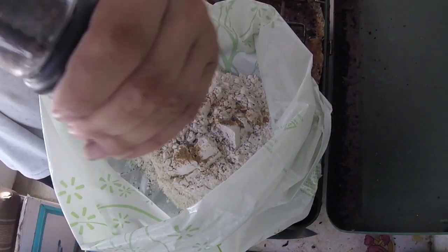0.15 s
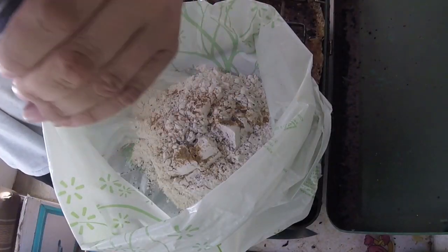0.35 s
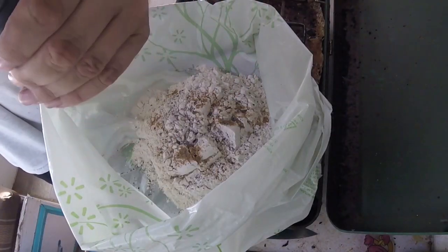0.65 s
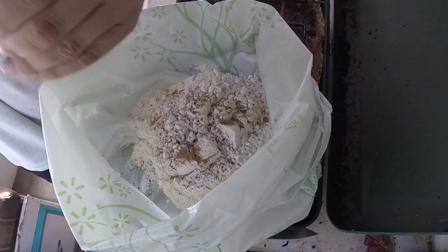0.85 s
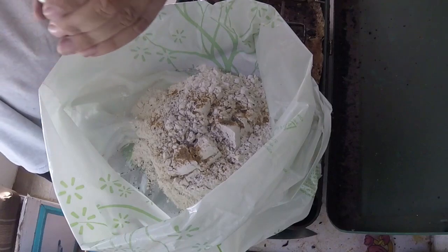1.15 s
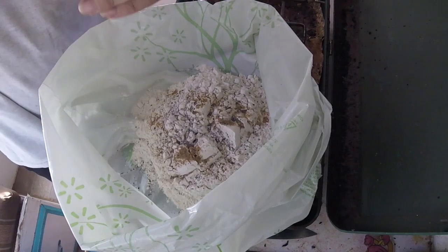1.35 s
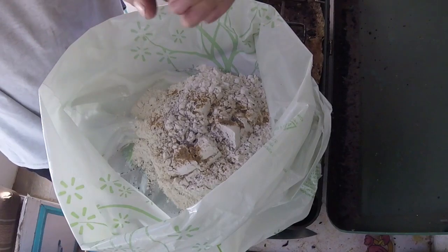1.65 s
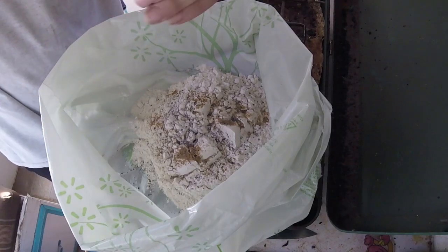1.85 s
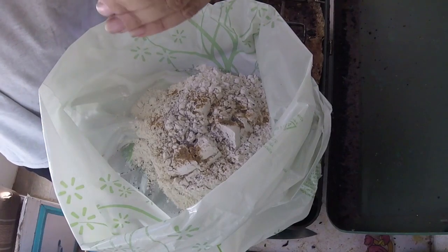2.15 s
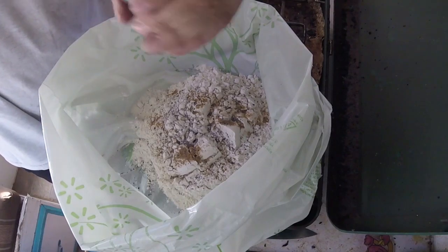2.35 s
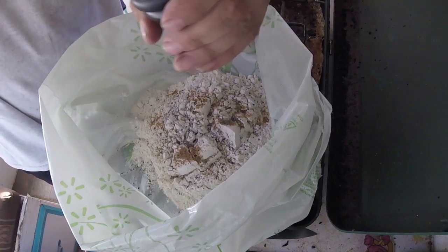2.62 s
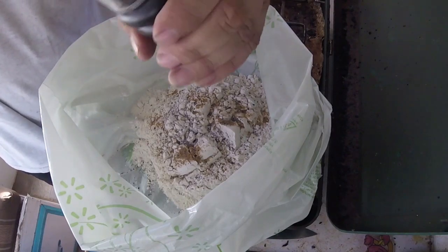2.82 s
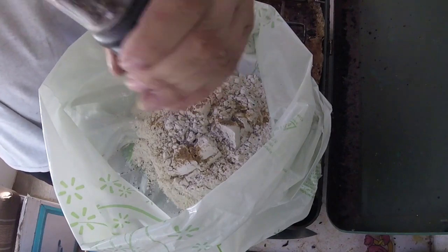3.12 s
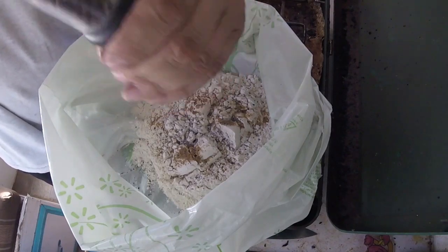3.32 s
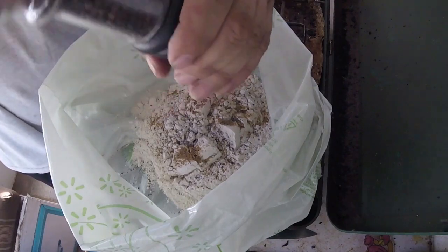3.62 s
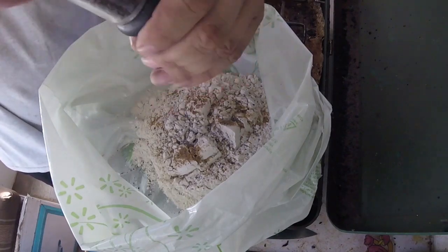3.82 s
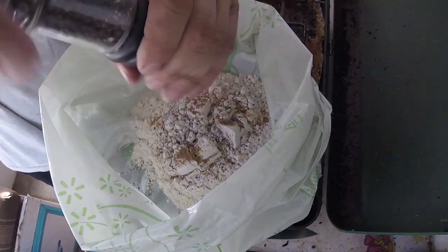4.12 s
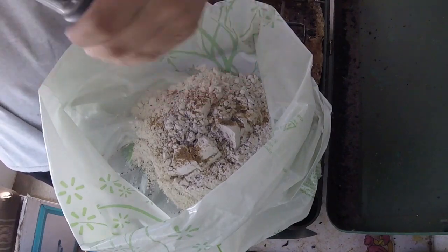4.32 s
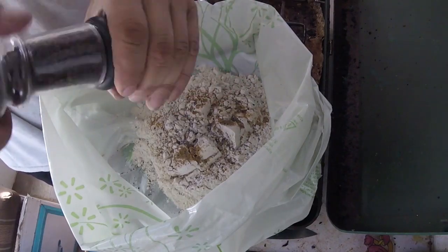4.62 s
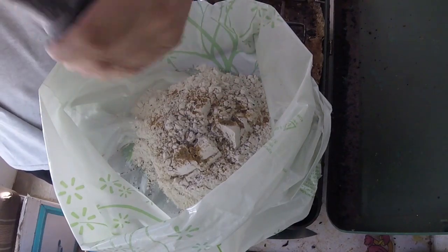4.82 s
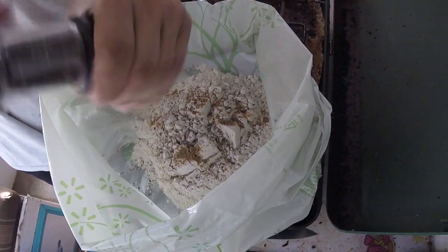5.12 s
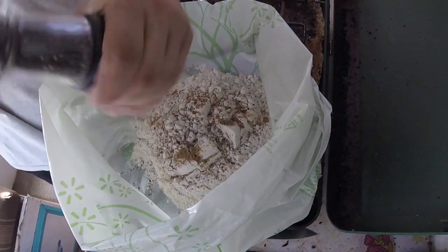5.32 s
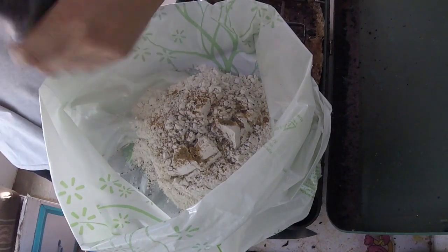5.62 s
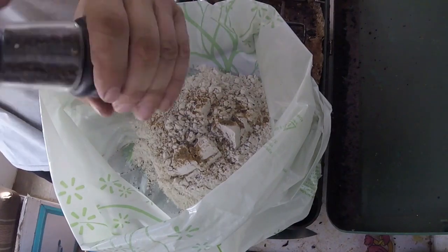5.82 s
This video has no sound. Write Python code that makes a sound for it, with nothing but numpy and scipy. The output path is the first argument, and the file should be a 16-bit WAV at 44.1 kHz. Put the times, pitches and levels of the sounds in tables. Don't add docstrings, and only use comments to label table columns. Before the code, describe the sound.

Close, dry cracks and gritty crunches from a glass pepper grinder, with bright pings of tumbling peppercorns between twists and a faint appliance hum.

```python
import sys
import numpy as np
from scipy import signal
from scipy.fft import rfft, irfft, next_fast_len
from scipy.io import wavfile
from scipy.ndimage import uniform_filter1d, map_coordinates

SR = 44100
rng = np.random.default_rng(int(sys.argv[2]) if len(sys.argv) > 2 else 0)


def ratio(d):
    e = np.asarray(d, float) / 20
    return 10 ** e


def digitize_waveform(pressure):
    field = np.atleast_2d(pressure).T
    bounded = np.clip(field, -1, 1)
    quanta = np.round(bounded * 32767).astype(np.int16)
    wavfile.write(sys.argv[1], SR, quanta)


N = 262836

# pitch_hz, level_db per Hz
KITCHEN = [(7, -23), (12, 6), (28, 4), (51, -5), (78, -12.5), (112, -16.5), (221, -27.5), (1000, -45.5),
           (2350, -47), (6000, -50), (15500, -82)]
# pitch_hz, width_hz, level_db
HUM = [
    (64, 13, -45.5),
    (161, 45, -63),
    (314, 12, -69),
    (1397, 120, -68.5),
]
# time_s, low_db, middle_db, upper_db
DRONE_SWELLS = [(0, -5, -8, 10), (.3, 3, 5.5, 7), (.9, 2, -1, -12), (1.3, -3, -9, -1), (3.6, -6, -7, -12),
                (4.2, 8.5, 1, 4), (4.6, 5.5, -4, -3), (5.3, -5, -13, -14), (5.96, -10, -12, -4)]
# start_s, end_s, first_hz, last_hz, level_db
WHINES = [
    (.05, .95, 314, 309, -61),
    (0, .9, 240, 230, -66),
    (3.8, 4.8, 168, 172, -58),
    (4.0, 4.45, 266, 290, -59),
    (4.05, 4.75, 1340, 1380, -73),
]
# pitch_hz, time to fade by 60 dB_s
WALLS = [(300, 0.18), (2000, 0.13), (8000, .13), (15000, 0.099)]

# pitch_hz, width_hz, level_db
GLASS = [
    (3180, 200, -4.5),
    (7750, 310, 0.5),
    (8095, 380, 1),
    (12500, 480, -11),
]
# pitch_hz, level_db per Hz
SKIRT = [(1000, -37.5), (3000, -36), (9000, -29)]
# pitch_hz, level_db per Hz
PATTER = [(500, -41), (1200, -27), (2500, -15.5), (4300, -6.5), (7000, -3), (10000, -9.5), (15500, -12.5)]
# start_s, ring_db, time to fade by 20 dB_s, low_mode_db
SLIDES = [(0, -44, 4, -4), (.13, -42.5, 0.5, -7), (.288, -36, -0.03, -5), (.46, -42, .19, -8),
          (.8, -39.5, 0.1, -6), (1.04, -47, .1, -7), (1.29, -31, .028, -9), (1.366, -58, .05, -6),
          (1.39, -46.5, -1, -6), (1.77, -40, .13, -7.5), (1.897, -56, .1, -8), (1.96, -37, 0.5, -11),
          (2.22, -41.5, 1, 2), (2.34, -35.5, 0.8, -2.5), (2.87, -38, .15, -4.5), (3.115, -27, .04, 0),
          (3.266, -47, .1, -4), (3.29, -36.5, .14, -3.5), (3.426, -46, .1, -4), (3.43, -29, 1, -4),
          (3.455, -28, .1, -5.5), (3.57, -41, 1.5, -3), (3.69, -24, .035, -7), (3.919, -33.5, .38, -2),
          (4.198, -26, .032, -6.5), (4.499, -30, .16, -8), (4.705, -27, .9, -2.5), (4.745, -26, .03, -2.5),
          (4.8, -35, .4, -4), (5.075, -29, .12, -8.5), (5.312, -18.5, .07, -4.5), (5.38, -32.5, 2.1, -2.5),
          (5.46, -31, 0.15, -7), (5.655, -27, .12, -11.5), (5.929, -29, .12, -2)]
# start_s, hold_s, level_db
POURS = [(.415, .015, -35), (1.0, .03, -50), (1.75, .04, -47), (1.93, .05, -43), (2.72, .04, -44),
         (2.85, .05, -48), (3.3, .02, -48), (3.465, .03, -38.5), (4.505, .03, -34), (4.84, .04, -45),
         (5.055, .04, -35), (5.4, .08, -40), (5.655, .03, -32), (5.72, .05, -41)]
# start_s, peak_db
TICKS = [(0.0344, -24.5), (.069, -21), (0.108, -12), (.177, -24.5), (0.2414, -29), (0.5023, -22),
         (0.5536, -24), (.6208, -34.5), (.7287, -29.5), (0.77, -24), (0.988, -24), (1.163, -32.5),
         (1.2337, -30), (1.277, -33), (1.288, -17.5), (2.055, -18.5), (2.5141, -13.5), (3.4565, -18.5),
         (3.5974, -21), (3.683, -11), (3.908, -17.5), (3.9756, -20.5), (4.0424, -19.5), (5.2675, -20),
         (5.2869, -17), (5.46, -17), (5.629, -16), (5.658, -17), (5.7478, -19.5), (5.9232, -17.5)]
# start_s, peak_db, low_mode_db
PLINKS = [(.0163, -36, -5), (.2925, -20.5, 4), (.331, -32, -2), (.6956, -32.5, 2), (.794, -30, 4),
          (.9485, -17, 8), (1.457, -29, 8), (1.728, -25, -10), (2.459, -26, 1), (2.486, -23, 1),
          (2.5485, -20.5, 3), (2.584, -18, -1), (2.6178, -17, 1), (3.0007, -27, -6), (3.0777, -25, 7),
          (3.0835, -21.5, 1), (3.0985, -23.5, 1), (3.1117, -16, -3), (3.4331, -16, 2), (3.639, -26.5, 2),
          (4.1949, -15, 2), (4.465, -22, 0), (4.4977, -21, 6), (4.868, -22, -10), (4.9666, -21, -6),
          (5.0376, -18, -4), (5.2994, -17, 7), (5.3124, -7, -3), (5.8803, -25, 0), (5.9195, -24, 5)]
# start_s, peak_db, low_mode_db
TAPS = [(.2193, -30, -8), (.2609, -26, -10), (.2854, -26, -6), (.6035, -40, -6), (.6518, -38, -8),
        (.675, -43, -6), (.7155, -38, -6), (.745, -38, -10), (.759, -40, -10), (.7891, -32, 0),
        (.7988, -30, 2), (1.2125, -42, -8), (1.294, -23, -8), (1.3711, -27, -8), (1.5831, -25, -10),
        (1.6247, -27, -10), (2.3655, -25, -3), (2.3775, -20, -2), (2.4315, -26, -6), (2.4747, -25, -8),
        (2.5199, -27, 5), (2.5278, -27, 5), (2.6253, -13, -10), (2.6756, -23, -8), (2.8885, -18, -10),
        (2.9074, -22, -8), (3.0063, -28, -8), (3.0609, -32, 0), (3.1179, -16, -4), (3.1256, -15, -4),
        (3.4277, -24, 0), (3.4432, -22, 0), (3.5903, -26, -8), (3.6101, -24, -8), (3.9228, -18, -2),
        (4.0082, -25, -8), (4.0285, -21, -2), (4.0483, -22, -6), (4.0725, -28, 3), (4.1036, -29, -8),
        (4.157, -27, -2), (4.1734, -26, -6), (4.2123, -19, -4), (4.3291, -32, -10), (4.4425, -25, -10),
        (4.5036, -24, 5), (4.6613, -30, -6), (4.7288, -11, -6), (4.7397, -13, -8), (4.7467, -15, -8),
        (4.7938, -22, -2), (4.878, -28, -15), (5.0734, -15, -10), (5.1293, -23, -10), (5.1863, -26, -12),
        (5.2822, -24, 5), (5.4795, -19, -10), (5.5302, -20, -12), (5.7589, -22, -10), (5.9135, -21, -4)]
# start_s, gap_s, contacts (count), peak_db
SKIPS = [(1.04, .028, 2, -28), (1.688, .021, 2, -29), (1.8, .031, 2, -30), (2.084, .015, 2, -25),
         (3.571, .03, 1, -23), (1.5702, .0344, 2, -23.5), (1.646, 0.019, 2, -23.5),
         (1.9775, 0.023, 2, -18.5), (2.331, .02, 1, -27), (2.348, .02, 1, -19), (2.4024, 0.019, 2, -17),
         (2.868, 0.024, 3, -23.5), (4.608, .0187, 2, -22), (4.685, 0.016, 3, -17.5), (4.81, 0.02, 2, -19.5),
         (4.9203, .018, 2, -26), (5.3916, 0.019, 3, -18)]

# pitch_hz, width_hz, level_db
BODY = [(325, 40, -14), (463, 20, -16), (890, 41, -6), (1220, 130, -10.5), (1664, 54, 1), (2500, 450, 2.5),
        (3800, 300, -7), (5050, 1900, -7)]
# pitch_hz, level_db per Hz
CRUNCH = [(120, -26.5), (200, -15.5), (446, -11.5), (515, -10.5), (874, -2.5), (974, -10.5), (1210, -2.5),
          (2560, -4), (8660, -16), (15500, -51)]
# pitch_hz, level_db per Hz
SPLIT = [(120, -30), (300, -14), (600, -10), (1000, -7), (1500, -2.5), (2560, -2), (8660, -20),
         (15500, -51)]
# pitch_hz, level_db per Hz
SHARD = [(1500, -12), (4000, -14), (6000, -3), (11000, -2), (15500, -7.5)]
# pitch_hz, level_db per Hz
PALM = [(100, -27.5), (300, -3), (700, -4.5), (1500, -34), (5000, -63)]
# start_s, hold_s, effort_db, time to fade by 20 dB_s
PUSHES = [(0, 0, -50.5, .5), (.41, .025, -28, .075), (.47, .01, -35, .05), (0.931, 0.00081, -22, 0.0539),
          (1.385, .02, -25.5, .05), (1.452, 0.082, -37.5, .07), (1.69, 0.063, -44, .9),
          (1.745, .02, -35, .03), (1.97, 0, -51.5, 0.5), (2.16, 0.021, -43, 2), (2.208, .03, -28, .06),
          (2.262, .018, -26.5, .06), (2.6, .02, -50, .9), (2.67, .02, -39, 1.7), (2.722, .04, -31.5, .04),
          (2.82, 0, -30, 0.0462), (3.2, .022, -31, .025), (3.291, .02, -28.5, .13), (3.7, 0, -49, -1.7),
          (3.771, .045, -30.5, .04), (3.852, .025, -31, .05), (4.338, 0, -42, .03), (4.368, 0, -28, 0.2),
          (4.45, 0.003, -31, 0.13), (4.71, 0, -50.5, .55), (4.926, .04, -32, 3), (4.99, .055, -27.5, .07),
          (5.12, 0, -50, .4), (5.33, 0.038, -54, 0.5), (5.534, 0.084, -32, 0.12), (5.95, 0, -52, .3)]
# start_s, peak_db, brightness_db,
# knock_hz
CRACKS = [(.292, -44, -9, 2940), (.366, -14.5, -4, 4990), (.4035, -17.5, 1, 2480), (.8968, -13, -13, 2540),
          (.918, -11, 1, 2500), (1.113, -36.5, -7, 1720), (1.372, -27, -31, 2700), (1.39, -16, -39, 2600),
          (1.463, -36, 3, 2520), (1.484, -25.5, -12, 2520), (1.496, -13.5, -8, 2500),
          (2.205, -24, -21, 2470), (2.513, -43, 7, 2940), (2.679, -20, -11, 1640), (2.715, -21, -20, 2700),
          (2.754, -18.5, -16, 2660), (2.81, -23.5, -32, 2220), (3.183, -37, 4, 2380),
          (3.201, -26, -17, 2950), (3.269, -10, -9, 3200), (4.195, -40, 5, 3060), (4.347, -28, -16, 2780),
          (4.351, -19.5, -20, 1510), (4.364, -20.5, -29, 2360), (4.911, -30, 0, 2540),
          (4.938, -22, -5, 2500), (4.979, -29, -21, 2630), (5.312, -31, 5, 2880), (5.517, -21, -7, 1520),
          (5.549, -24, -13, 2060)]
# start_s, peak_db, thud_db, knock_hz
JAMS = [(.857, -28, -10, 2780), (.867, -27.5, -15, 2800), (1.757, -31, -7, 1650), (1.899, -8, -15, 2630),
        (2.144, -28, -3, 1600), (2.309, -30, -2, 1660), (2.655, -34, 2, 2840), (3.755, -33, 0.5, 2950),
        (3.763, -28, -8, 2600), (3.786, -25, -7, 1190), (3.848, -25.5, -3.5, 2300), (4.44, -32, 6, 1590),
        (4.979, -28, -5, 1120), (5.507, -25.5, -6, 3030), (5.571, -27, -6, 2700), (5.612, -19.5, -6, 2520)]
# start_s, peak_db, knock_hz
CRACKLES = [(0.3724, -14, 2730), (0.4104, -12, 4440), (0.4194, -14, 2510), (0.9178, -8, 2780),
            (1.3804, -11, 2470), (1.4014, -15, 2550), (1.4244, -22, 2670), (1.5244, -19, 2310),
            (2.1435, -22, 1460), (2.1544, -24, 1760), (2.2124, -15, 3150), (2.2274, -16, 2280),
            (2.2364, -19, 2600), (2.2628, -17, 2690), (2.2684, -17, 2280), (2.2854, -21, 2880),
            (2.6504, -24, 2890), (2.7274, -17, 2920), (2.7364, -16, 2710), (2.8024, -17, 2660),
            (2.8204, -21, 2160), (3.2124, -20, 2870), (3.2274, -25, 2740), (3.2824, -15, 1670),
            (3.3114, -19, 2250), (3.3324, -27, 2750), (3.3494, -29, 2490), (3.7744, -19, 1420),
            (3.7994, -22, 2590), (3.8094, -27, 4430), (3.8352, -24, 2360), (3.8536, -21, 3100),
            (3.8606, -20, 2470), (3.8794, -26, 1210), (4.3844, -22, 2420), (4.4194, -24, 2430),
            (4.4544, -22, 2770), (4.4794, -23, 2990), (4.9164, -17, 2550), (4.9666, -17, 2120),
            (4.9994, -18, 2570), (5.0114, -16, 2320), (5.0214, -20, 2450), (5.0304, -17, 2110),
            (5.0464, -17, 2770), (5.0614, -21, 2820), (5.0974, -23, 3110), (5.5274, -17, 2560),
            (5.5844, -23, 2150), (5.5994, -16, 2620), (5.6274, -23, 4890)]


def unit(x):
    return x / np.sqrt(np.mean(x ** 2) + 1e-20)


def along(points, hz):
    f, v = np.transpose(points)
    return np.interp(np.log(hz + 1), np.log(f + 1), v)


def curves(rows):
    s, *cols = np.transpose(rows)
    return [np.interp(np.arange(N) / SR, s, c) for c in cols]


def wobble(rate):
    knots = rng.standard_normal(int(N * rate / SR) + 4)
    return map_coordinates(knots, [np.arange(N) * rate / SR])


def filtered(x, response):
    m = 2 * next_fast_len(N // 2 + SR // 4)
    return irfft(rfft(x, m) * response(np.fft.rfftfreq(m, 1 / SR)), m)[..., :N]


def causal(gain):
    cep = irfft(np.log(gain + 1e-6))
    half = len(cep) // 2
    return np.exp(rfft(np.r_[cep[0], 2 * cep[1:half], np.zeros(half)]))


def struck(x, spectrum, modes, ring_db):
    def response(f):
        peaks = 0
        for hz, width_hz, db in modes:
            damping = (f * width_hz) ** 2
            peaks = peaks + ratio(2 * db) * damping / ((hz * hz - f * f) ** 2 + damping)
        power = ratio(2 * along(spectrum, f)) + ratio(2 * ring_db) * peaks
        return causal(unit(np.sqrt(power)))
    return filtered(x, response)


def grains(rate, spread_db, clump_db, life):
    draw = rng.random((2, N))
    size = ratio(-spread_db * np.log(draw[1] + 0.06)) * (draw[0] < rate / SR)
    puffs = signal.lfilter([1], [1, -np.exp(-1 / (life * SR))], size * ratio(clump_db * wobble(60)))
    return unit(puffs * rng.standard_normal(N))


def bursts(times, levels_db, t60s, edge_db):
    out, t = np.zeros(N + SR), np.arange(SR // 8) / SR
    for s, db, t60 in zip(times, levels_db, t60s):
        shape = ratio(-60 * t / t60) + ratio(edge_db - 60 * t / 0.0017)
        puff = shape * rng.standard_normal(len(t))
        puff *= np.linalg.norm(shape) / np.linalg.norm(puff)
        out[round(s * SR):][:len(t)] += ratio(db) * puff
    return out[:N]


def knocks(times, levels_db, pitches_hz, t60):
    out, t = np.zeros(N + SR), np.arange(SR // 16) / SR
    for s, db, hz in zip(times, levels_db, pitches_hz):
        out[round(s * SR):][:len(t)] += ratio(db - 60 * t / t60) * np.sin(2 * np.pi * hz * t)
    return out[:N]


def surges(times, levels_db, holds, fades, rises):
    t = np.arange(N) / SR
    soon = np.searchsorted(times, t, "right")
    now, started = soon - 1, soon > 0
    soon = np.minimum(soon, len(times) - 1)
    past_hold_s = np.maximum(t - times[now] - holds[now], 0)
    dying = levels_db[now] - 20 * past_hold_s / np.abs(fades[now])
    coming = levels_db[soon] - 20 * np.abs(times[soon] - t) / np.abs(rises[soon])
    return np.maximum(started * ratio(dying), ratio(coming))


def background():
    air = filtered(rng.standard_normal(N), lambda f: ratio(along(KITCHEN, f)))
    out = ratio(-36.0 + 1.84 * wobble(3.14)) * unit(air)
    swells = [0] + curves(DRONE_SWELLS)
    for (hz, width_hz, db), swell_db in zip(HUM, swells):
        line = filtered(rng.standard_normal(N), lambda f: 1 / (1 + ((f - hz) / width_hz * 2) ** 2))
        out = out + ratio(db + swell_db) * unit(line)
    return out


def whines():
    t, out, fade_s = np.arange(N) / SR, np.zeros(N), .12
    for start, end, first_hz, last_hz, db in WHINES:
        hz = np.interp(t, [start, end], [first_hz, last_hz]) * (1 + .004 * wobble(6))
        gate = np.clip(np.minimum(t - start, end - t) / fade_s, 0, 1)
        out += gate * ratio(db + 1.5 * wobble(8)) * np.sin(2 * np.pi * np.cumsum(hz) / SR)
    return out


def contacts():
    tick_low_db, skip_low_db = -21, -13
    jolt_db, jolt_low_db = -3.5, 3
    rows = [(s, db, tick_low_db) for s, db in TICKS] + list(PLINKS) + list(TAPS)
    for s, gap, count, db in SKIPS:
        rows += [(s + gap * k, db, skip_low_db) for k in range(round(count))]
    rows += [(s, db + bright / 2 + jolt_db, jolt_low_db) for s, db, bright, hz in CRACKS]
    return np.transpose(rows)


def hopper():
    s, db, fade, deep_db = np.transpose(SLIDES)
    rise, hold = np.minimum(.6 * fade, .065), np.full(len(s), .004)
    settled_db = -69
    ring = surges(s, db, hold, fade, rise) + ratio(settled_db)
    low = surges(s, db + deep_db, hold, fade, rise) + ratio(settled_db - 3)
    patter = grains(rate=1100., spread_db=4.5, clump_db=1.1, life=0.0017)
    glass_colour = [(1000, -32), (3000, -30), (8000, -23.0), (15500, -41)]  # (Hz, dB per Hz)
    glass = struck(ratio(-6.5) * ring * patter, glass_colour, GLASS[1:], ring_db=0)

    s, hold, db = np.transpose(POURS)
    pour = surges(s, db, hold, fades=np.full(len(s), .045), rises=np.full(len(s), .04))
    rustle = ratio(-47) * (ring / ratio(-35)) ** .8 + pour
    crumbs = grains(rate=1500.0, spread_db=5.5, clump_db=1.8, life=0.0021)
    dry = struck(ratio(2.5) * rustle * crumbs, PATTER, [], ring_db=0)

    s, db, low_db = contacts()
    ticks = bursts(s, db - 7, np.full(len(s), .022), edge_db=-29)
    high = struck(ticks, PATTER, GLASS, ring_db=7.5)
    deep_ticks = bursts(s, db + low_db - 11.5, np.full(len(s), .012), edge_db=-28)
    deep = struck(ratio(-4.0) * low * patter + deep_ticks, SKIRT, GLASS[:1], ring_db=-1.0)
    return glass + dry + high + deep


def breaks():
    thud_db, t60 = -48, .06
    rows = [(s, db, bright, thud_db, hz, t60) for s, db, bright, hz in CRACKS]
    for s, db, thud, hz in JAMS:
        bright_db = -10 + .7 * (db + 25)
        rows.append((s, db, bright_db, db + thud, hz, t60))
    return np.transpose(rows)


def burr():
    s, hold, db, fade = np.transpose(PUSHES)
    rise = np.full(len(s), .018)
    effort = surges(s, db, hold, fade, rise) + ratio(-65)
    crumble = ratio(-2.5) * effort * grains(rate=1800., spread_db=3.5, clump_db=1.6, life=.0011)
    crunch = struck(crumble, CRUNCH, BODY, ring_db=-1.5)

    s, db, bright_db, thud_db, knock_hz, t60 = breaks()
    split = struck(bursts(s, db - 4, t60, edge_db=-4.0), SPLIT, BODY[1:], ring_db=-1.5)
    snap_db = db + np.minimum(bright_db, 6) - 7.5
    snap = struck(bursts(s, snap_db, 0.84 * t60, edge_db=-8), SHARD, [], ring_db=0)
    thud = struck(bursts(s, thud_db - 6.5, 0.55 * t60, edge_db=-4), PALM, BODY[:3], ring_db=2.0)
    return crunch + split + snap + thud + knocks(s, db - 5.5, knock_hz, t60=.03)


def crackle():
    s, db, knock_hz = np.transpose(CRACKLES)
    puffs = bursts(s, db - 11, np.full(len(s), .035), edge_db=-6)
    crunch = struck(puffs, CRUNCH, BODY, ring_db=-1.6)
    return crunch + knocks(s, db - 16, knock_hz, t60=.022)


def room(x, piece=SR // 4):
    out = np.zeros(N + SR)
    for start in range(0, N, piece):
        hz, t, z = signal.stft(rng.standard_normal(SR // 3), SR, nperseg=256)
        fading = ratio(-60 * t / along(WALLS, hz)[:, None])
        tail = signal.istft(z * fading, SR, nperseg=256)[1]
        wet = signal.fftconvolve(x[start:start + piece], tail / np.linalg.norm(tail))
        out[start + 90:][:len(wet)] += wet
    return out[:N]


def scene():
    mill = burr() + hopper() + crackle()
    mono = mill + ratio(-7) * room(mill) + background() + whines()
    stray = ratio(-69) * unit(filtered(rng.standard_normal(N), lambda f: 1 / (1 + (f / 70) ** 2)))
    return np.array([mono + stray, mono - stray])


def roll_off(x):
    return signal.sosfilt(signal.butter(12, 16650, fs=SR, output="sos"), x)


def record(dry):
    dry = dry / (1 + np.abs(dry / .95) ** 6) ** (1 / 6)
    main = filtered(dry, lambda f: ratio(np.interp(f, [15200, 15400, 15900], [0, -22, -60])))
    top = filtered(dry, lambda f: ratio(-24) * (f > 15300) * (f < 16700))
    power = top ** 2
    sharp = uniform_filter1d(power, size=64) > 18 * np.abs(uniform_filter1d(power, size=2048))
    near_attack = uniform_filter1d(1. * sharp, size=400) > 1e-6
    opened = uniform_filter1d(1. * near_attack, size=128)
    mix = main + opened * top - .0018
    return roll_off(mix)


dry = scene()
out = record(dry)
digitize_waveform(out)
```